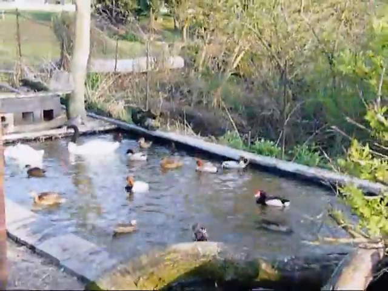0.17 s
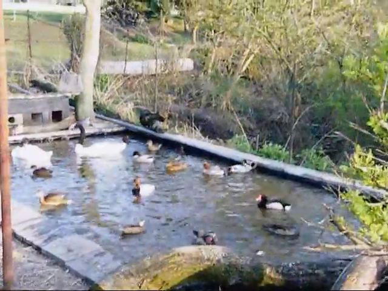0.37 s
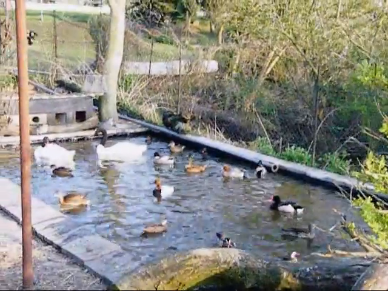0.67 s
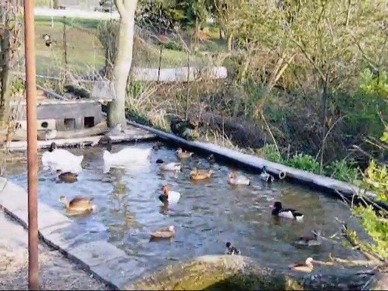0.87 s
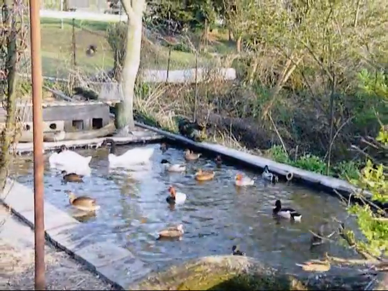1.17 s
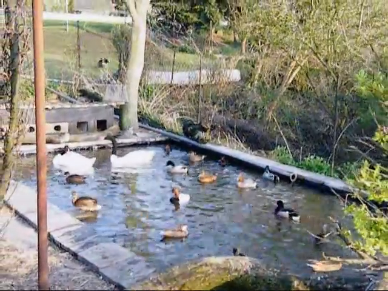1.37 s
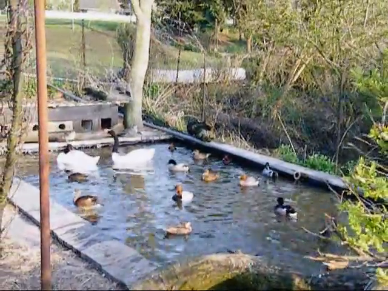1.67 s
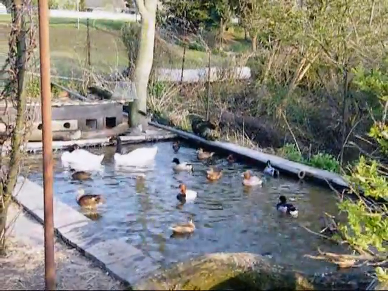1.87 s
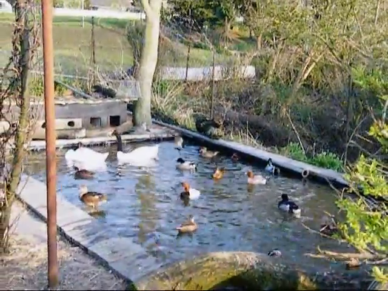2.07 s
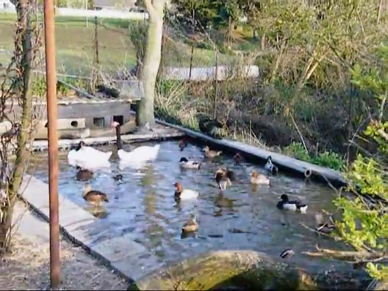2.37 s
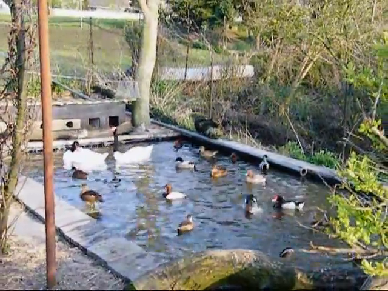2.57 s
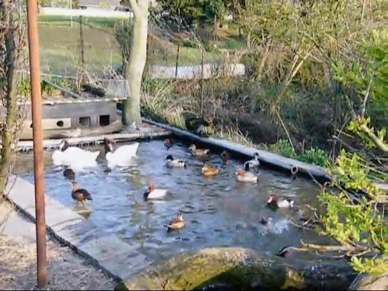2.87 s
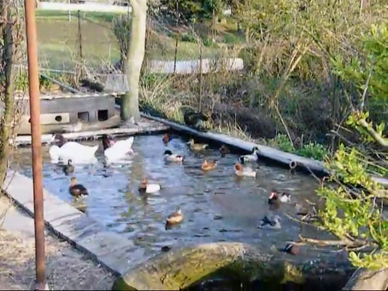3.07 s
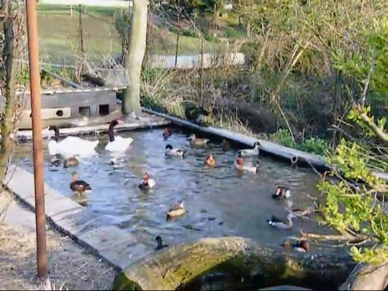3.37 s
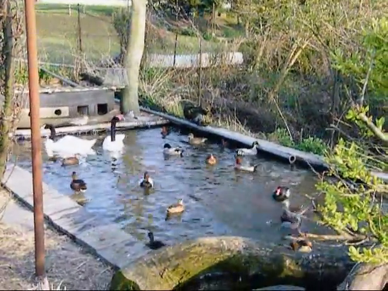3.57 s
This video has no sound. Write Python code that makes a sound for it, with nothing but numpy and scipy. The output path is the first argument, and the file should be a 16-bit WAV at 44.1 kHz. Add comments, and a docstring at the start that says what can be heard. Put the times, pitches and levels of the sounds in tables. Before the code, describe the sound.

Ducks on a pond give sharp pips, soft clucks and thin falling whistles through the first 1.3 seconds, over a steady outdoor wash and faint hums. A distant road roar swells from about 1 second, peaks near 2 and stays. Light splashes and drips come mostly from 2.3 seconds on. Single pips return near 2.1 and 3.4 seconds, whistles near 3 and 3.6. The treble sounds glassy.

```python
"""Waterfowl on a small pond

In front of the microphone, birds give very short sharp pips and thin falling whistles, and splash a
little; banks and bushes scatter the sound. Behind them lie a steady outdoor wash, faint hums, a brief
soft hiss and a broad roar, probably a car on a distant road, that swells and stays. The camera samples
coarsely and holds each sample, which mirrors everything into a glassy treble."""
import sys
import numpy as np
from scipy import signal
from scipy.fft import rfft, irfft
from scipy.io import wavfile
from scipy.ndimage import uniform_filter1d

SR = 44100
rng = np.random.default_rng(int(sys.argv[2]) if len(sys.argv) > 2 else 0)


def materialize(psi):
    """Save the field psi as 16-bit PCM at rate SR to the path in sys.argv[1].

    A 1-D psi becomes a single channel; in a 2-D psi each row is a channel.
    """
    bounded = np.clip(np.atleast_2d(psi).T, -1, 1)
    quanta = np.round(bounded * 32767).astype(np.int16)
    wavfile.write(sys.argv[1], SR, quanta)


N = 164052
TIME = np.arange(N) / SR

# colour of the outdoor wash (frequency [Hz], relative level [dB])
WASH_SPECTRUM = [(30, -42), (55, -38), (85, -19.5), (150, -8), (250, -5), (450, -2), (750, -2), (1150, 4),
                 (1650, 0.5), (2200, -2.5), (2600, -12), (3200, -8.5), (4000, -14), (5400, -20)]
# gentle rise and fall of the wash (time [s], relative level [dB])
WASH_SWELL = [(0, 0.5), (.3, 1.5), (.6, 3), (1.0, 1.5), (1.5, 4), (2.0, 0.5), (2.4, 1.5), (2.75, 1.5),
              (3.2, 6), (3.72, 1.5)]
# a hollow that wanders through wash and road (time [s], centre [Hz], gain [dB])
HOLLOW_PATH = [(0, 1470, -3), (.3, 1480, -0.5), (.56, 1620, -9.5), (.8, 1390, -10.5), (1.05, 1150, -2),
               (1.3, 950, -0.5), (1.6, 750, 1.5), (2.0, 1050, -2), (2.5, 1280, 0.5), (3.0, 1450, -1),
               (3.72, 1450, -4)]
# roar of the distant road (time [s], level [dB], hump centre [Hz], half width [octaves])
ROAD_ROAR = [(0, -30.5, 1540, 0.28), (.28, -28.5, 1550, 0.37), (.55, -42, 1290, 0.45),
             (.8, -30.5, 1430, 0.48), (1.0, -28, 1550, 0.19), (1.2, -24, 1420, 0.12),
             (1.5, -22.5, 1260, 0.2), (1.75, -22, 1240, 0.34), (1.95, -19.5, 1150, 0.34),
             (2.12, -19.5, 1420, 0.26), (2.25, -23.5, 1340, 0.29), (2.57, -21.5, 1505, 0.19),
             (2.78, -23.5, 1510, 0.17), (3.0, -23, 1510, 0.2), (3.3, -23.5, 1500, 0.26),
             (3.72, -22.5, 1450, 0.29)]
# skirts of that roar (frequency [Hz], level relative to the hump [dB])
ROAD_SKIRT = [(60, -76), (300, -29), (600, -13), (850, -4.5), (1500, -11), (2500, -21), (3200, -20),
              (4200, -26), (5400, -29.5)]
# background hums, lowest first (frequency [Hz], width [Hz], base level [dB])
HUM_TONES = [(302.4, 9.5, -48.5), (895, 33, -51.5), (1245, 8.3, -38)]
# coming and going of the hums (time [s], gain of the low one [dB], gain of the upper two [dB])
HUM_SWELL = [(0, -14, -2), (.4, 7, 2.5), (1.0, -0.5, -15), (1.5, 2, -3), (2.0, -7, -6), (2.6, -17, 1),
             (3.05, 4.5, 8.5), (3.72, -10, 0)]
# sharp pips (time [s], pitch [Hz], second harmonic level [dB], third relative to second [dB])
PIP_CALLS = [(0.035, 1607, -21, -6.5), (0.0868, 1578, -22, -5), (0.3428, 1604, -20.5, -4.5),
             (0.3910, 1607, -22, -1), (0.6940, 1580, -21, -3), (1.1889, 1580, -21, -5.5),
             (1.2495, 1604, -23.5, 2), (2.1085, 1550, -23.5, -10), (3.417, 1545, -22, -14)]
# soft clucks after some pips (time [s], pitch [Hz], base level [dB])
CLUCK_CALLS = [(0.064, 1380, -28), (0.371, 1404, -26), (0.445, 1234, -25), (0.721, 1440, -29),
               (0.738, 1400, -26)]
# whistles, one curve each (time [s], pitch [Hz], level [dB])
WHISTLE_CURVES = [
    [(.133, 4100, -44), (.146, 4200, -37), (.160, 4020, -33), (.166, 3520, -35), (.176, 3580, -37),
     (.192, 3300, -37), (.212, 3090, -34), (.228, 3030, -44)],
    [(.214, 4750, -41), (.235, 4650, -39), (.246, 4400, -42), (.262, 4150, -44)],
    [(1.134, 4200, -41), (1.144, 3700, -38), (1.150, 4120, -28), (1.157, 4520, -34), (1.160, 4550, -41),
     (1.164, 4150, -32), (1.169, 3750, -39), (1.183, 3650, -46)],
    [(1.208, 3650, -41), (1.218, 3600, -36), (1.235, 3400, -37), (1.246, 3600, -37), (1.28, 3550, -52),
     (1.297, 3600, -37), (1.315, 3550, -45)],
    [(2.944, 3850, -40), (2.953, 4200, -36), (2.967, 4200, -37), (2.978, 3450, -36), (2.988, 3600, -40),
     (3.002, 3330, -32), (3.028, 3080, -36)],
    [(3.593, 3800, -40), (3.603, 4330, -32), (3.610, 4000, -41), (3.617, 3650, -35), (3.630, 3400, -39)],
]
# splashes, except the third row: a faint, soft hiss near 3 kHz, from the distant road or a far bird
# (time [s], length [s], level [dB], centre [Hz])
SPLASHES_AND_HISS = [(0.207, 0.043, -48, 4800), (1.498, 0.082, -36, 4600), (1.398, 0.63, -40.5, 2950),
                     (2.319, 0.089, -38.5, 3740), (2.722, 0.34, -37, 4830), (2.911, 0.025, -31, 4570),
                     (3.125, 0.42, -39.5, 4260), (3.572, 0.18, -38.5, 4000)]
# single drips on the pond (time [s], pitch [Hz], peak level [dB])
DRIP_PINGS = [(2.492, 5350, -30), (2.783, 5040, -27), (2.856, 4900, -35), (2.915, 5400, -27),
              (2.928, 4370, -30), (2.996, 4200, -20), (3.035, 5160, -28), (3.192, 3920, -23.5)]


def amp(db):
    """Decibels to gain."""
    return 10 ** (np.asarray(db) / 20)


def unit(x):
    """Scales to rms 1."""
    return x / np.sqrt(np.mean(x ** 2) + 1e-20)


def add(mix, start, sound):
    """Mixes a sound in at a time in seconds."""
    part = mix[max(round(start * SR), 0):][:len(sound)]
    part += sound[:len(part)]


def curve(rows, t):
    """Each column after the first, read at the times t."""
    times, *columns = np.transpose(rows)
    return [np.interp(t, times, column) for column in columns]


def spectrum(points, hz):
    """Gain of a spectrum, read on a log-frequency axis."""
    point_hz, db = np.transpose(points)
    return amp(np.interp(np.log(hz + 1), np.log(point_hz), db))


def bell(hz, centre, octaves):
    """Gaussian hump of height 1 on an octave axis."""
    return np.exp(-.5 * (np.log2((hz + 1) / centre) / octaves) ** 2)


def lowpass(x, hz):
    """Steep low-pass."""
    return signal.oaconvolve(x, signal.firwin(601, hz, window=("kaiser", 9), fs=SR), "same")


def grid():
    """Frame times (a column) and bin frequencies (a row)."""
    return np.arange(N // 256 + 5)[:, None] * 256 / SR, np.fft.rfftfreq(1024, 1 / SR)


def patchy_noise(shape, patch_db):
    """Noise of rms 1 with a colour for each frame, a wandering hollow and small random patches."""
    t, hz = grid()
    real, imaginary, grain = rng.standard_normal((3, len(t), len(hz)))
    patches = unit(uniform_filter1d(uniform_filter1d(grain, size=10, axis=0), size=9, axis=1))
    centre, gain_db = curve(HOLLOW_PATH, t)
    hollow_db = gain_db * bell(hz, centre, octaves=0.073)
    colour = shape / np.linalg.norm(shape, axis=-1, keepdims=True)
    frames = (real + 1j * imaginary) * colour * amp(patch_db * patches + hollow_db)
    return unit(signal.istft(frames.T, nperseg=1024, noverlap=768)[1][:N])


def wash(level_db=-30):
    """Steady air and water noise around the pond."""
    _, hz = grid()
    swell_db, = curve(WASH_SWELL, TIME)
    return amp(level_db + swell_db) * patchy_noise(spectrum(WASH_SPECTRUM, hz), patch_db=1)


def road():
    """Tyre roar from far off: one broad hump that swells, shifts and changes width."""
    t, hz = grid()
    _, centre, octaves = curve(ROAD_ROAR, t)
    shape = np.sqrt(bell(hz, centre, octaves) + spectrum(ROAD_SKIRT, hz) ** 2)
    level_db = curve(ROAD_ROAR, TIME)[0]
    return amp(level_db) * patchy_noise(shape, patch_db=1.6)


def hums():
    """Narrow bands of noise, heard as wavering tones that come and go in the background."""
    hz = np.fft.rfftfreq(N, 1 / SR)
    tones = []
    for centre, width, db in HUM_TONES:
        band = rfft(rng.standard_normal(N)) / (1 + (2 * (hz - centre) / width) ** 2)
        tones.append(amp(db) * unit(irfft(band, N)))
    low_db, high_db = curve(HUM_SWELL, TIME)
    return amp(low_db) * tones[0] + amp(high_db) * sum(tones[1:])


def bird_note(hz, harmonics_db, length_s=0.0089, rise_s=0.0013, fall_s=0.0017):
    """About a dozen sharp pulses of a bird's voice; the pitch rises a little, then falls."""
    t = np.arange(0, length_s, 1 / SR)
    position = 2 * t / length_s - 1
    sag = 0.043 * position / 2
    arch = 0.028 * (position ** 2 - np.mean(position ** 2))
    phase = 2 * np.pi * np.cumsum(hz * (1 - sag - arch)) / SR
    envelope = np.minimum(t / rise_s, 1) * np.minimum((length_s - t) / fall_s, 1)
    pulses = sum(amp(db) * np.cos(k * phase) for k, db in enumerate(harmonics_db, 1))
    return -np.sqrt(2) * envelope * pulses


def pips_and_clucks():
    """Birds on the water: pips with strong overtones, and lower, softer clucks."""
    out = np.zeros(N)
    for start, hz, db, third_db in PIP_CALLS:
        add(out, start, amp(db) * bird_note(hz, harmonics_db=[-0.5, 0, third_db]))
    for start, hz, db in CLUCK_CALLS:
        add(out, start, amp(db) * bird_note(hz, harmonics_db=[1, -7.5, -15, -15]))
    return out


def whistles(jitter=0.0098):
    """Thin, slightly unsteady bird whistles: pure tones that mostly slide down."""
    out = np.zeros(N)
    for rows in WHISTLE_CURVES:
        t = np.arange(rows[0][0], rows[-1][0], 1 / SR)
        hz, db = curve(rows, t)
        waver = unit(uniform_filter1d(rng.standard_normal(N), size=90))[:len(t)]
        phase = 2 * np.pi * np.cumsum(hz * (1 + jitter * waver)) / SR
        envelope = amp(db) * signal.windows.tukey(len(t), .1)
        add(out, t[0], np.sqrt(2) * envelope * np.sin(phase))
    return out


def splashes_and_hiss(clicks_per_s=900):
    """Dense tiny clicks: splashes, and one faint, soft hiss from the distant road or a far bird."""
    out, hz = np.zeros(N), np.fft.rfftfreq(SR, 1 / SR)
    for start, length, db, centre in SPLASHES_AND_HISS:
        clicks = rng.standard_normal(SR) * (rng.random(SR) < clicks_per_s / SR)
        band = irfft(rfft(clicks) * bell(hz, centre, octaves=.35), SR)[:int(length * SR)]
        envelope = np.sin(np.linspace(0, np.pi, len(band)))
        add(out, start, amp(db) * unit(band) * envelope)
    return out


def drips(rise_s=0.00075):
    """Single drops fall back on the pond, each with a brief high ping."""
    out = np.zeros(N)
    t = np.arange(0, rise_s * 10, 1 / SR)
    envelope = t / rise_s * np.exp(1 - t / rise_s)
    for start, hz, db in DRIP_PINGS:
        add(out, start, amp(db) * envelope * np.sin(2 * np.pi * hz * t))
    return out


def bank_scatter(direct, wet_db, t60_s=0.24, echoes_per_s=2000):
    """The direct sound reaches the microphone with faint echoes from banks and bushes."""
    t = np.arange(SR // 2) / SR
    echoes = rng.standard_normal(len(t)) * (rng.random(len(t)) < echoes_per_s / SR)
    echoes *= amp(-60 * t / t60_s)
    return direct + amp(wet_db) * signal.fftconvolve(direct, echoes / np.linalg.norm(echoes))[:N]


def scene():
    """One microphone at the pond: birds and water in front, wash, road, hiss and hums behind."""
    events = bank_scatter(pips_and_clucks(), wet_db=-11)
    events += bank_scatter(whistles(), wet_db=-6.5)
    events += bank_scatter(splashes_and_hiss() + drips(), wet_db=-4)
    return (events + wash() + road() + hums())[None]


def record(dry, bass_cut_hz=80, notch_hz=4814, notch_width_hz=28, hold=4, edge_hz=12600):
    """The camera cuts the bass, notches the treble, holds coarse samples and limits the band."""
    x = signal.sosfilt(signal.butter(6, bass_cut_hz, btype="high", fs=SR, output="sos"), dry[0])
    # the narrow notch rings briefly after each pip
    x = signal.lfilter(*signal.iirnotch(notch_hz, notch_hz / notch_width_hz, fs=SR), x)
    coarse = lowpass(x, SR / hold / 2)[::hold]
    stepped = np.repeat(coarse, hold)[:N]  # the steps mirror the sound into the treble
    return lowpass(stepped, edge_hz)[None]


dry = scene()
out = record(dry)
materialize(out)
```